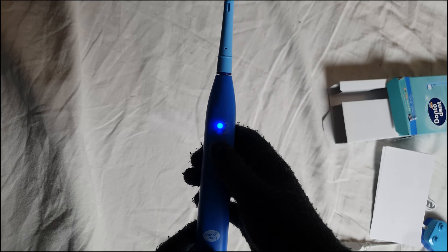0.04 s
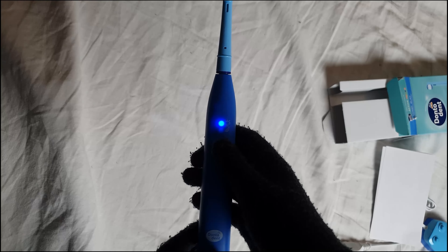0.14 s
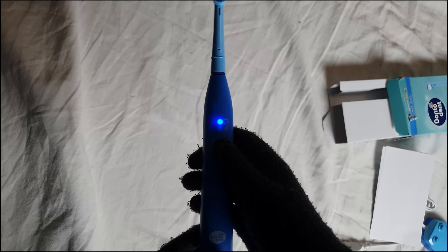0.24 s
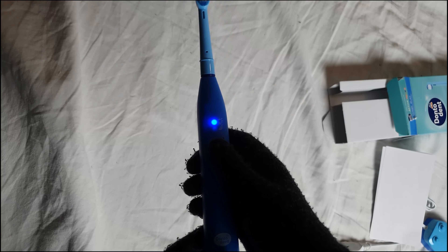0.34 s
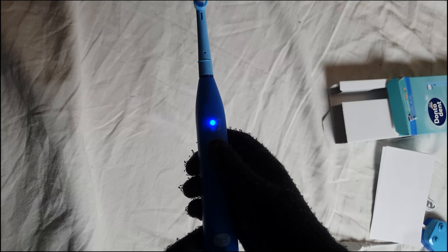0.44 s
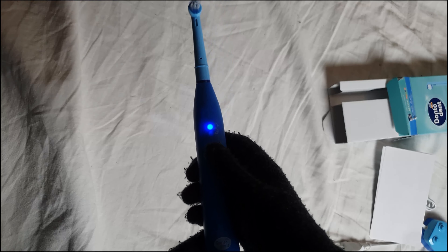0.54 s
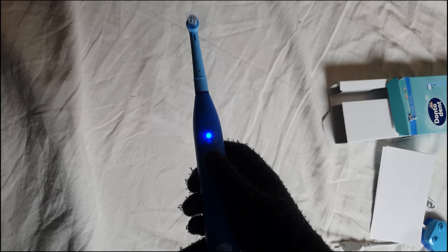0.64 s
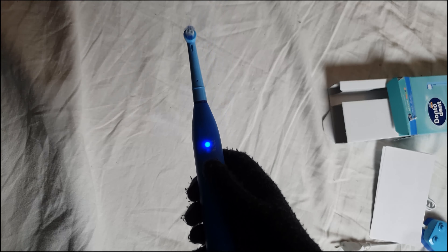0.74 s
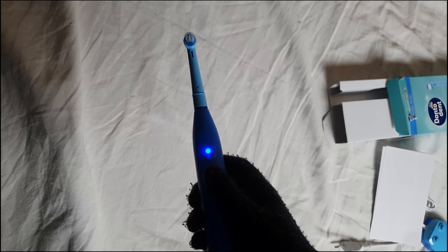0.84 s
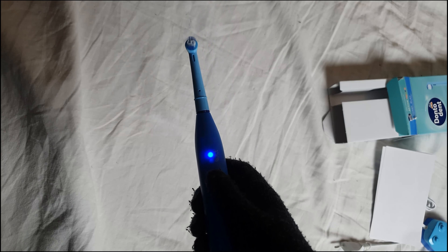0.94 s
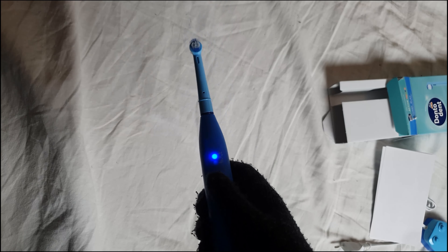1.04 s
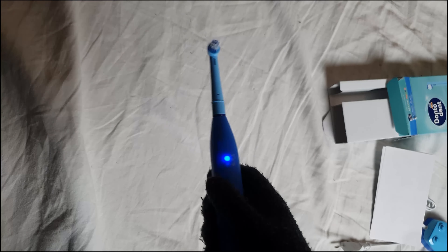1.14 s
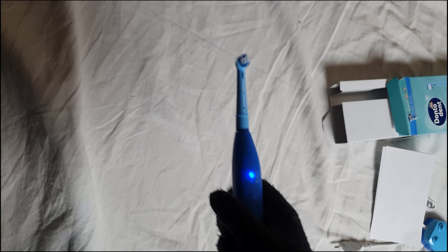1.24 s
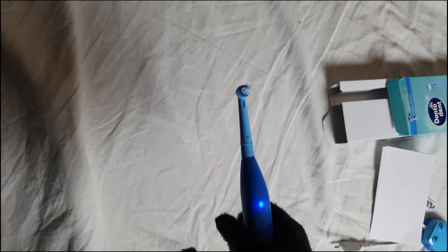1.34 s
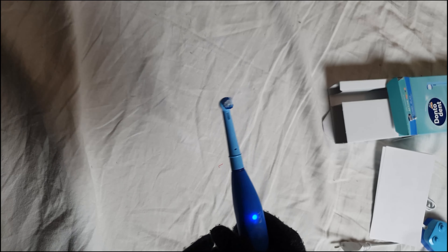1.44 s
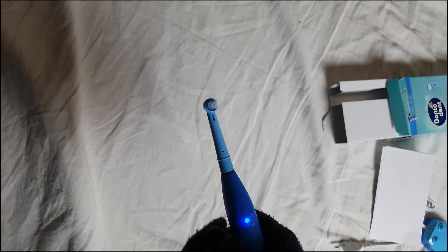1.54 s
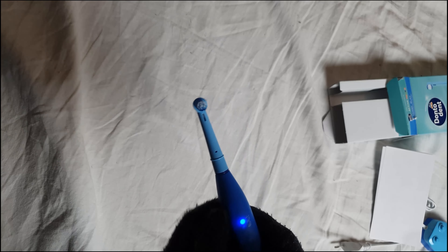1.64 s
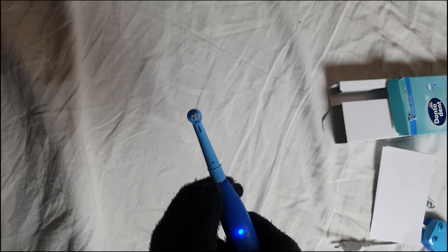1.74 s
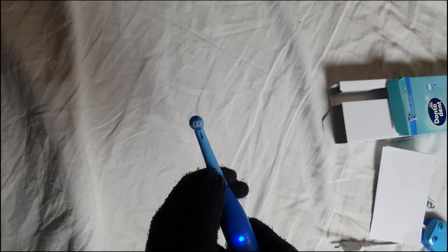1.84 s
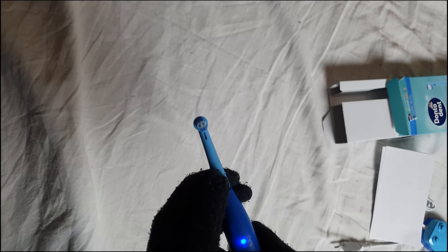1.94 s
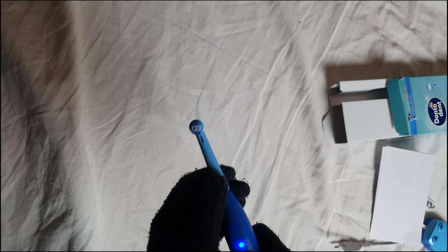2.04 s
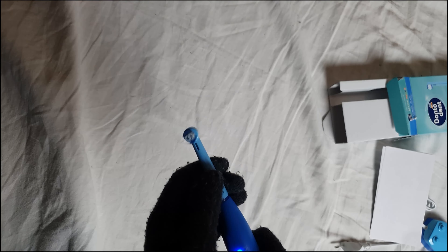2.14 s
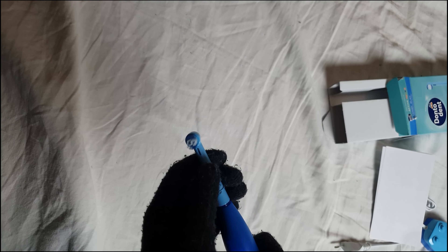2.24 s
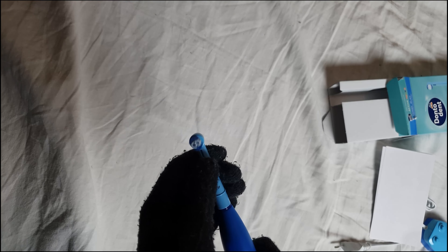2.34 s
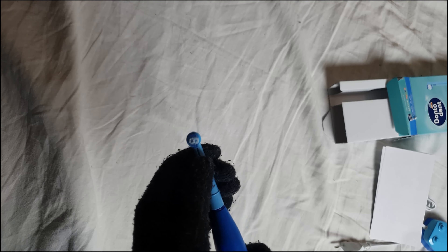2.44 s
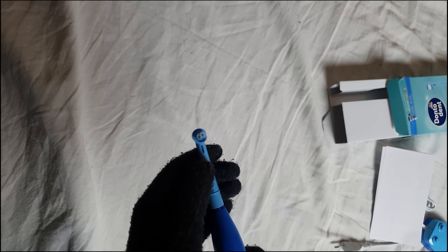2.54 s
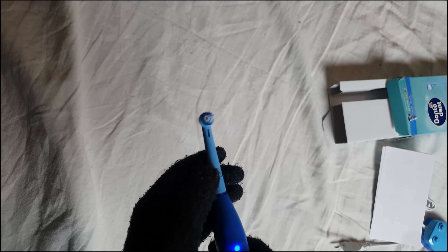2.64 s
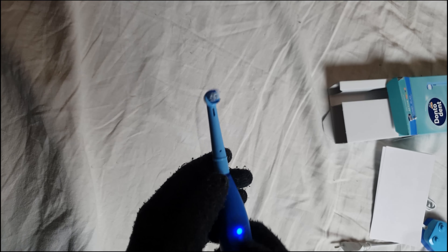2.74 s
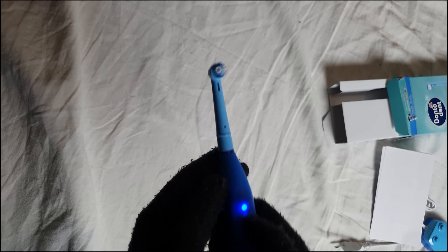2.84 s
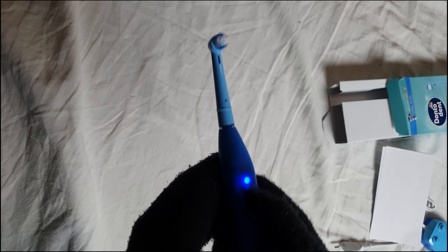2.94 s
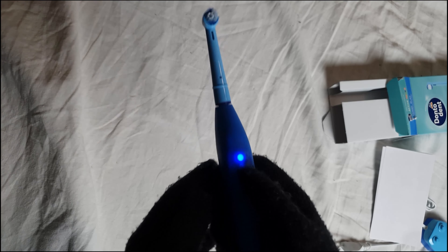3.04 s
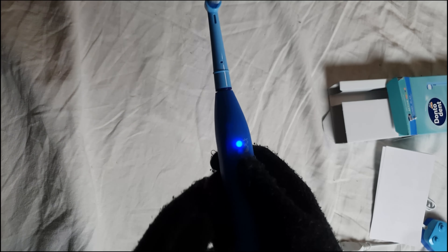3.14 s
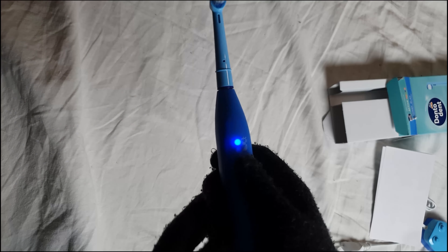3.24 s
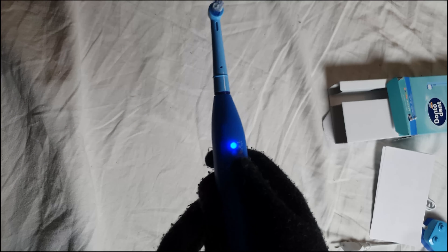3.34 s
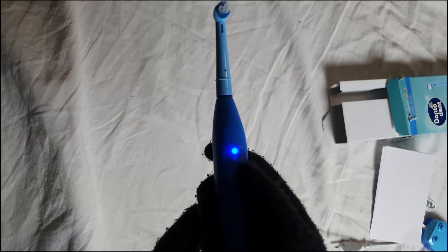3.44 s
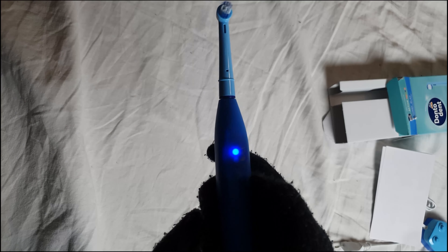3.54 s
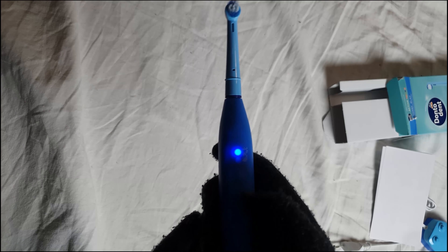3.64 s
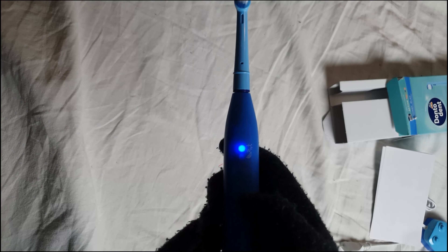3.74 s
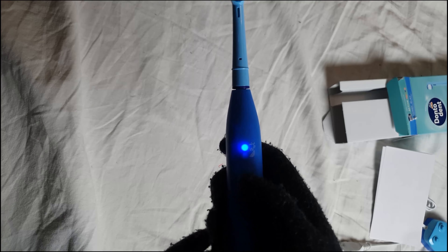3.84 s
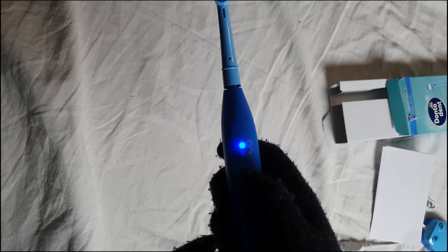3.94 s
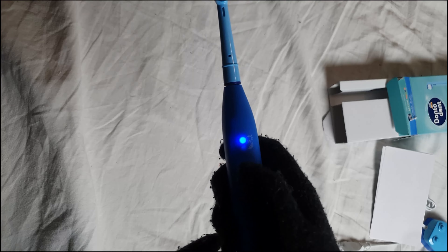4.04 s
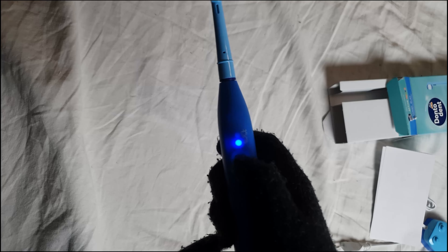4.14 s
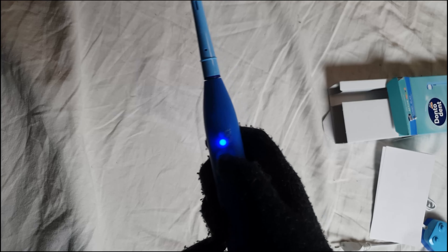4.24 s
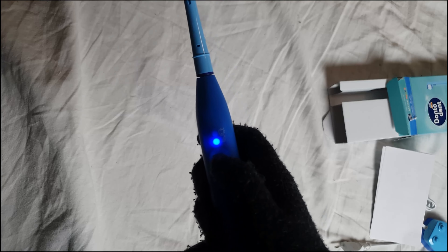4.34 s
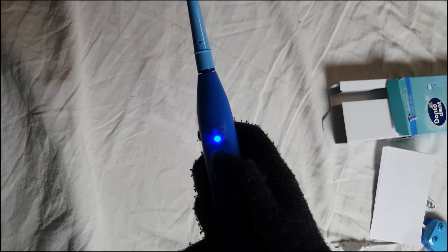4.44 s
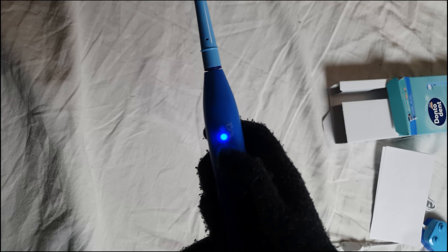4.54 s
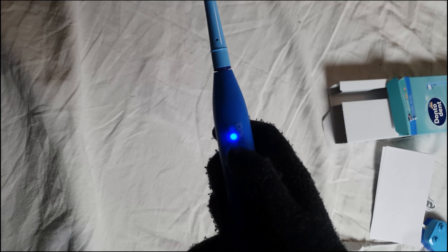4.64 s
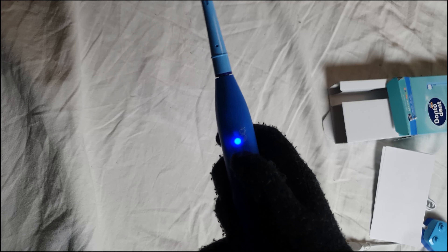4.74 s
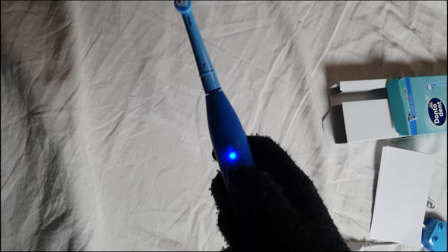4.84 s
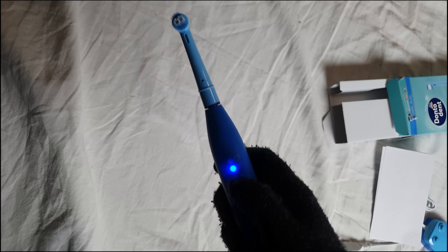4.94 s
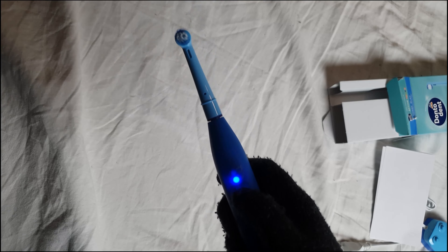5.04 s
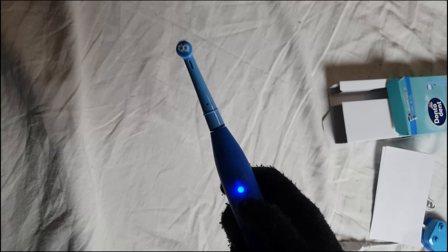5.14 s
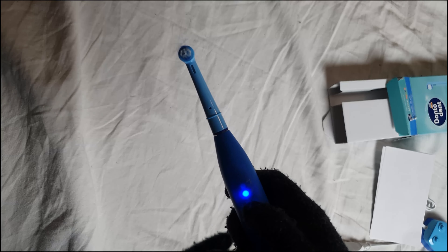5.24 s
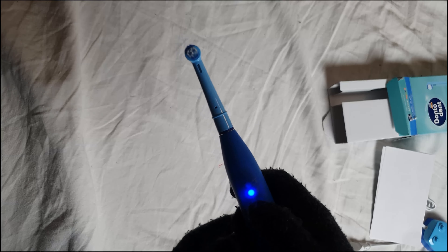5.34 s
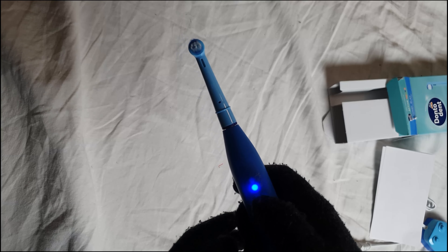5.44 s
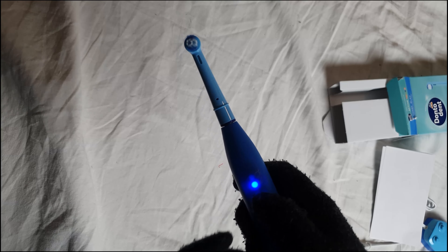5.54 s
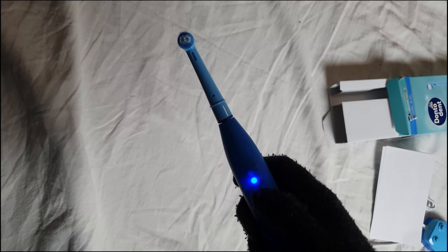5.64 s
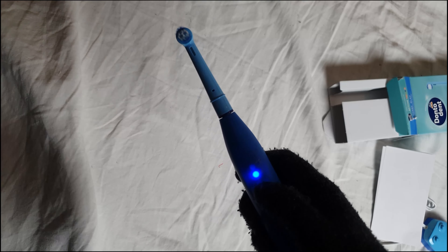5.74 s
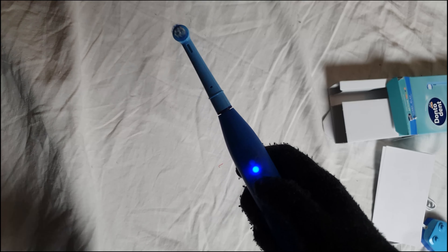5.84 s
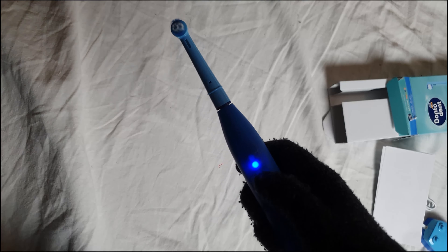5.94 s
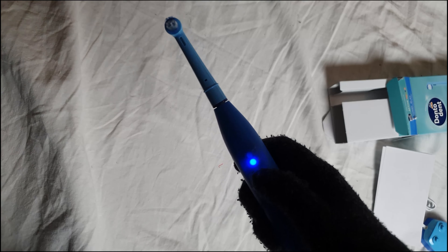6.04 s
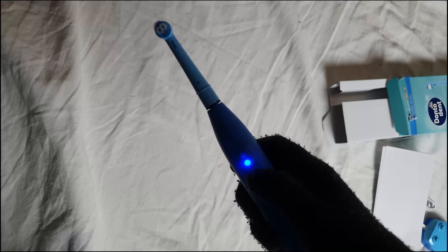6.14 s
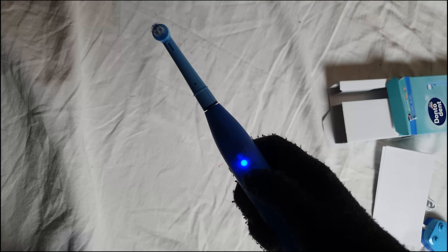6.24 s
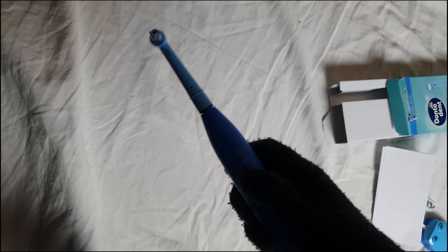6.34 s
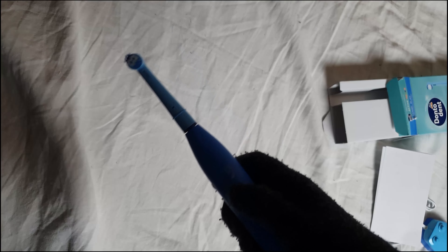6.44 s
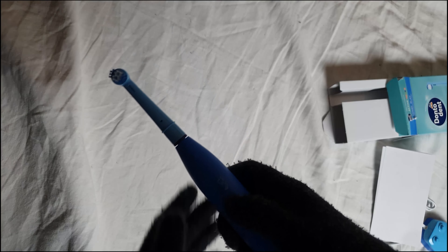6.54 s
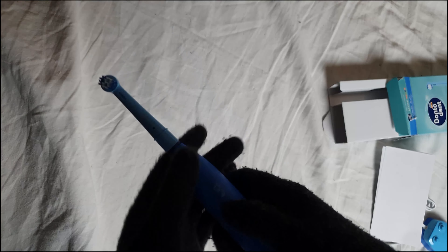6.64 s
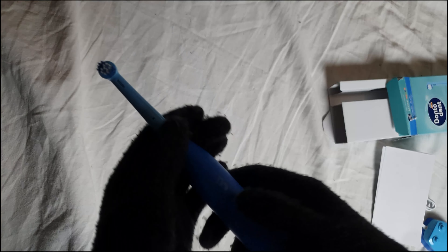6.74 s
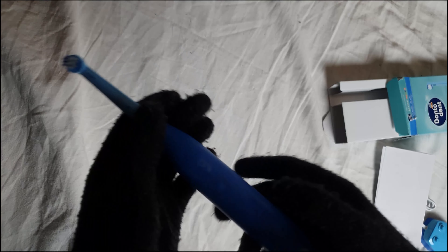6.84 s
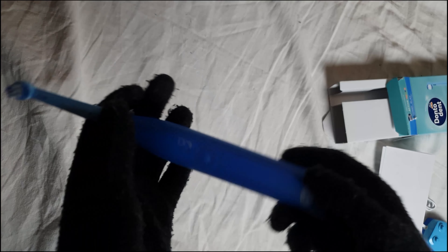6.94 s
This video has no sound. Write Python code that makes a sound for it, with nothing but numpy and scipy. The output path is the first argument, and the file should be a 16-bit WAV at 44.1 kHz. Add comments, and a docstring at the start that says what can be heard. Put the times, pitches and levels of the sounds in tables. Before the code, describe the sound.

An electric toothbrush buzzes close up with a rattling mid-high whine, drops to a slightly lower speed, then shuts off with small plastic knocks.

```python
"""An electric toothbrush runs in a gloved hand, close to the microphone in a small room.
Its 23-tooth gear whines, built from sine tones locked to the crank. The crank also rattles the plastic
housing on every turn: bursts of coloured noise. Narrow and wide bands of the sound swell and dip.
It steps down to a slower mode, is switched off and coasts to rest with a few loose knocks;
then a glove slides along the handle with a soft hiss."""
import sys
import numpy as np
from scipy import signal
from scipy.fft import rfft, irfft
from scipy.io import wavfile

SR = 44100
rng = np.random.default_rng(int(sys.argv[2]) if len(sys.argv) > 2 else 0)


def dump(signal):
    """Clip the signal to [-1, 1] and save it as 16-bit WAV at the path in sys.argv[1]."""
    limited = np.clip(np.atleast_2d(signal).T, -1, 1)
    pcm = np.round(limited * 32767).astype(np.int16)
    wavfile.write(sys.argv[1], SR, pcm)


N = 308700
TIME = np.arange(N) / SR   # seconds


def from_db(db):
    """Turn decibels into a plain multiplier."""
    return 10 ** (np.asarray(db) / 20)


def rms_one(x):
    """Scale a sound to an average power of one."""
    return x / np.sqrt(np.mean(x ** 2) + 1e-20)


def in_time(rows):
    """Draw straight lines between the rows of a time table; give each column at every sample."""
    seconds, *columns = np.transpose(rows)
    return [np.interp(TIME, seconds, column) for column in columns]


def at_hz(points, hz):
    """Read a pitch table, with pitch spaced as the ear hears it (on a log scale)."""
    table_hz, value = np.transpose(points)
    return np.interp(np.log(np.maximum(hz, 1)), np.log(table_hz), value)


def during(one_edge, other_edge):
    """About 1 between two soft edges and 0 outside; reversed edges give a negative result."""
    softness_s = .05
    first_step = np.tanh((TIME - one_edge) / softness_s)
    second_step = np.tanh((TIME - other_edge) / softness_s)
    return (first_step - second_step) / 2


def drift(rate_hz):
    """Wander by chance around zero with spread 1; changes faster than the rate are smoothed away."""
    step = 100   # samples between two chance values
    r = np.exp(-2 * step * np.pi * rate_hz / SR)
    chance = rng.standard_normal(N // step + 2002)
    slow = signal.lfilter([1], [1, -2 * r, r * r], chance)[2000:]   # skip the filter's start
    return np.interp(np.arange(N) / step, np.arange(len(slow)), rms_one(slow))


# how much stronger the left side is than the right: (pitch [Hz], left over right [dB])
TILT = [(60, -2), (300, -3.5), (700, -1), (1400, 2.5), (2600, -2.5), (4400, 2.5), (6200, 2), (8300, 10.5),
        (11000, 7), (15000, 5.5)]
PORT_LAG_S = 0.00016   # sound reaches the left microphone opening this much earlier


def colour(pair, spectrum):
    """Filter a stereo pair to a spectrum, lean it left or right by pitch, and scale to unit power."""
    hz = np.arange(N // 2 + 1) * SR / N
    level, half_tilt = at_hz(spectrum, hz), at_hz(TILT, hz) / 2
    left = from_db(level + half_tilt) * np.exp(2j * np.pi * hz * PORT_LAG_S)
    right = from_db(level - half_tilt)
    return rms_one(irfft(rfft(pair) * np.array([left, right]), N))


def spread(three, alike):
    """Mix one shared signal with one for each side; alike = 1 makes both sides the same."""
    alike = np.clip(alike, 0, 1)
    return np.sqrt(alike) * three[0] + np.sqrt(1 - alike) * three[1:]


def noise(alike):
    """White noise on two sides that are partly alike."""
    return spread(rng.standard_normal((3, N)), alike)


def tone(angle, db, pan_db, lead):
    """A sine on two sides: positive pan is louder on the left, lead [radians] starts the left earlier."""
    lean = from_db(pan_db / 2)
    level = from_db(db) / np.sqrt((lean ** 2 + lean ** -2) / 4)   # keeps the average power when leaning
    return level * np.array([lean * np.sin(angle + lead), np.sin(angle) / lean])


# the crank speed wavers with the load in the fast mode: (time [s], speed [turns per s])
FAST_SPEED = [(0.0, 65.0), (0.15, 64.8), (1.72, 64.6), (1.9, 64.9), (2.15, 64.7), (2.63, 65.2),
              (2.95, 65.0), (3.53, 65.3), (4.03, 64.5), (4.12, 64.9)]
# the same in the slow mode: (time [s], speed [turns per s])
SLOW_SPEED = [(4.4, 58.4), (4.63, 58.5), (5.194, 57.6), (5.7, 57.6), (6.074, 57.3), (6.29, 58.0)]
STEP_DOWN_S, SETTLE_S = 4.148, .06   # start of the slow mode, time constant of settling into it
OFF_S, COAST_S = 6.311, .172         # switched off, time that friction takes to stop it evenly


def motor():
    """Speed under power, share of the slow mode, and share of the speed left after switching off."""
    slow = 1 - np.exp(-np.maximum(TIME - STEP_DOWN_S, 0) / SETTLE_S)
    powered = (1 - slow) * in_time(FAST_SPEED)[0] + slow * in_time(SLOW_SPEED)[0]
    left = np.clip(1 - (TIME - OFF_S) / COAST_S, 0, 1)
    return powered, slow, left


# strongest gear tones, with base levels that the swings below move: (multiple of the crank speed,
# fast mode [dB], slow mode [dB], share of the tooth swing, share of the load swing,
# share of the octave swing, share of the third-harmonic swing, left over right [dB],
# left lead [radians], place in the turn [turns], throb depth [0-1], beat depth [0-1])
GEAR = [(21, -48, -51.5, 0, .6, 0, 0, -3, 1.4, .72, 0, .25),
        (22, -55.5, -53.5, 0, 1.2, 0, 0, 1, .8, .72, 0, .08),
        (23, -41.7, -41.7, 1, 0, 0, 0, 0, 0, .72, 0, .04),
        (44, -47.5, -50.5, 0, .3, .2, 0, -2, 2.3, .59, .3, .17),
        (46, -44.5, -45.5, 0, 0, 1, 0, 0, 2.0, .59, .5, .1),
        (48, -45, -49, 0, 0, .6, 0, 0, 2.2, .59, .35, .17),
        (69, -54, -54, 0, 0, 0, 1, 5, 4.3, .63, .95, .2)]
# weaker tones from uneven teeth, base levels: (multiple of the crank speed, fast mode [dB], slow mode [dB])
SIDEBANDS = [(6, -82, -82), (7, -77, -81), (8, -77, -76), (10, -73, -79), (12, -77, -69), (13, -70, -70),
             (14, -62, -60), (15, -70, -62), (16, -67, -59), (17, -69, -65), (18, -62, -64), (19, -56, -60),
             (20, -62, -61), (24, -54, -54), (25, -55, -57), (26, -58, -59), (27, -62, -60), (35, -52, -57),
             (40, -51, -58), (42, -54, -58), (43, -54, -57), (45, -56, -54), (47, -57, -58), (49, -50, -57),
             (50, -54, -50), (52, -56, -48), (54, -54, -50), (56, -53, -50), (59, -54, -52), (68, -59, -51),
             (70, -61, -53), (71, -64, -56), (72, -64, -55)]
# how well the housing sends out a gear tone, used as it slides down in pitch: (pitch [Hz], level [dB])
HOUSING = [(100, -44), (550, -6), (780, 6), (1050, 12), (1550, 13.5), (2000, 1), (2700, 0.5), (4200, 3)]
# The next four act only through their swing around their own average.
# whine at the tooth rate: (time [s], level [dB])
TOOTH_SWING = [(0.05, -43), (.4, -42), (.85, -46), (1.25, -48), (1.45, -45), (1.8, -46.5), (2.15, -44),
               (2.75, -45), (3.02, -40.5), (3.3, -43.5), (3.48, -36.5), (3.98, -37.5), (4.05, -41.5),
               (4.12, -38.5), (4.2, -41), (4.4, -37.5), (5.3, -41), (6.25, -40)]
# uneven load on the gear, in the tones beside the whine: (time [s], level [dB])
LOAD_SWING = [(0, -1.5), (1.2, 2), (2.5, -2), (2.75, 8), (3.02, 11), (3.25, 1.5), (3.55, 10.5), (4.0, 3.5),
              (4.6, 5.5), (5, -6.5), (6.3, -0.5)]
# octave of the whine: (time [s], level [dB])
OCTAVE_SWING = [(0, -51), (.45, -44.5), (1.25, -40.5), (1.6, -49), (1.85, -46), (2.15, -49), (2.4, -44),
                (3.0, -48), (3.2, -42), (3.55, -44), (3.95, -41.5), (4.17, -45), (4.35, -40), (4.65, -39),
                (5.0, -42), (5.6, -46.5), (6.3, -45)]
# third harmonic of the whine: (time [s], level [dB])
THIRD_SWING = [(0, -64), (1.1, -57), (1.5, -56), (1.85, -48), (2.2, -52), (2.85, -53), (3.2, -63),
               (3.6, -63), (3.95, -53), (4.6, -51), (5.5, -49), (6.3, -48.5)]
# the handle turns between the microphone openings: (time [s], tooth whine left over right [dB],
# left lead of the tooth whine [radians], whine near the octave left over right [dB])
LEAN = [(0, 7, 1.53, 1), (1.2, 6, 1.86, 14.5), (1.48, -3, 1.8, -8), (1.8, 2, 2.2, 0), (2.2, 1, 1.95, 14),
        (2.42, 9, 2.6, 5), (2.8, -1, 1.5, 7), (3.1, -1, 2.2, -4), (3.6, 0.5, 1.53, 0), (4.0, -4.5, 2.1, 5),
        (4.3, 4.5, 1.14, -2.5), (5.0, 3, 1.3, -1), (6.3, 5.5, 1.55, -6)]
TEETH = 23
BEAT_HZ = 5.3   # rate of the slow beats


def gear(turn, powered, left, slow, play_db, low_side_db=0.5, high_side_db=-3.5, play_share=0.61, octave_share=0.45):
    """Meshing teeth give tones at multiples of the crank speed; coasting, non-tooth ones fade faster."""
    swing_tables = (TOOTH_SWING, LOAD_SWING, OCTAVE_SWING, THIRD_SWING)
    swings = np.array([in_time(table)[0] for table in swing_tables])
    swings = swings - swings.mean(axis=1, keepdims=True)
    tooth_pan, tooth_lead, high_pan = in_time(LEAN)
    out, coasting, loaded = np.zeros((2, N)), left < 1, left ** 2
    # quick unsteadiness [dB]: 0.6 in the fast mode, 0.45 in the slow mode, 2.5 coasting
    flutter_db = np.where(coasting, 2.5, np.interp(slow, [0, 1], (.6, .45)))

    def level_db(k, fast_db, slow_db):
        """A tone's level by mode; coasting, it slides down through the housing's resonances."""
        db = fast_db + slow * (slow_db - fast_db)
        hz = k * powered[coasting]
        db[coasting] += at_hz(HOUSING, hz * left[coasting]) - at_hz(HOUSING, hz)
        return db

    for k, fast_db, slow_db, *shares, pan, lead, place, throb, beat in GEAR:
        angle = 2 * np.pi * (turn - place)
        is_tooth, near_octave = k == TEETH, abs(k - 2 * TEETH) <= 2
        db = level_db(k, fast_db, slow_db) + np.dot(shares, swings) + flutter_db * drift(20)
        # the teeth press harder once a turn, and the tone swells in slow beats
        throbbing = 1 + throb * np.cos(angle)
        beating = 1 + beat * np.cos(2 * np.pi * (BEAT_HZ * TIME + rng.random()))
        pan_now = pan + is_tooth * tooth_pan + near_octave * high_pan
        lead_now = lead + is_tooth * tooth_lead + .1 * drift(.3)
        line = throbbing * beating * tone(k * angle, db, pan_now, lead_now)
        out += line * (loaded if k % TEETH else 1)

    for k, fast_db, slow_db in SIDEBANDS:
        hz, high, near_octave = k * powered[0], k > 30, 43 <= k <= 49
        chance_angle = (.8 if high else np.pi) * rng.normal()
        angle = 2 * np.pi * k * (turn - .61) + chance_angle
        db = level_db(k, fast_db, slow_db) + 2 * drift(1.0)
        db = db + (high_side_db + play_share * play_db if high else low_side_db)
        db = db + near_octave * octave_share * swings[2]
        lead = 2 * np.pi * hz * PORT_LAG_S + rng.normal(0, 0.38)
        out += loaded * tone(angle, db, at_hz(TILT, hz), lead)
    return out


# a firm grip lets the handle hum: (from [s], to [s], level of the lower hum tone [dB])
GRIPS = [(0, 1.7, -78), (2.85, 4.07, -72.5)]


def hum(turn, pan_db=-4, fourth_db=-4):
    """The third and fourth multiples of the crank speed shake the whole handle as low tones."""
    level = sum(from_db(db) * during(start, end) for start, end, db in GRIPS)
    third = tone(3 * 2 * np.pi * turn, 0, pan_db, 0)
    fourth = tone(4 * 2 * np.pi * turn, fourth_db, pan_db, 0)
    return level * (third + fourth)


def surface(turn, alike, wear, size=680):
    """The same roughness passes on every turn, slowly changing as the parts shift."""
    tracks = signal.resample(rng.standard_normal((2, 3, size)), size * 10, axis=-1)
    position = (turn % 1 * (size * 10 - 1)).astype(int)
    passing = tracks[:, :, position]
    shift = wear * drift(0.42)   # fades between two rough tracks
    return spread(np.cos(shift) * passing[0] + np.sin(shift) * passing[1], alike)


# contacts within one turn, levels relative: (place [turns], width [turns], fast-mode rattle [dB],
# slow-mode rattle [dB], buzz and sizzle [dB], clatter [dB])
CONTACTS = [(0.107, 0.019, -12.5, -5.5, -18, -18.5), (0.298, 0.068, 2, -16, -7.5, -11),
            (0.52, 0.012, -18.5, -3.5, -5, -13), (0.576, 0.044, 1, 4.5, -17.5, 1.5),
            (0.649, 0.0052, -5, 11.5, 1, 2.5), (0.737, 0.011, -15, -19.5, 1, -6),
            (0.805, 0.065, -2.5, 1.5, -11, -14)]


def pressure(turn, levels_db, idle_db, uneven_db, narrow):
    """Contact force peaks at each contact in the turn, and lands a little differently every time."""
    lap, force = turn.astype(int), from_db(idle_db)
    for (place, width, *_), level_db in zip(CONTACTS, levels_db):
        chance = np.clip(rng.standard_normal(512), -2, 2)   # one value for each turn
        strength = from_db(level_db + uneven_db * chance)
        away = (turn - place + .5) % 1 - .5   # distance from the contact, in turns
        force = force + strength[lap] * np.exp(-np.abs(away) * narrow / width)
    return force


# Colours of the drive noises, relative levels. Low rub: (pitch [Hz], level [dB])
RUB = [(100, -24), (150, -18), (230, -21.5), (350, -12.5), (600, -12.5), (850, -3.5), (1100, -0.5),
       (1400, 3.5), (1750, 2.5), (2200, -31), (4000, -52)]
# plastic rattle: (pitch [Hz], level [dB])
RATTLE = [(600, -41), (1400, -6.5), (1900, -1.5), (2300, 3), (3050, 3), (3500, -3.5), (4000, -12),
          (9000, -22)]
# clatter of the shaft: (pitch [Hz], level [dB])
CLATTER = [(2000, -30.5), (3300, -5), (3700, -2.5), (4050, -1), (4700, -12.5), (5400, -18.5), (9000, -58.5)]
# buzz: (pitch [Hz], level [dB])
BUZZ = [(2500, -34), (4500, -3), (5200, 0.5), (6100, 2.5), (6800, -2.5), (7600, -37), (14000, -56)]
# sizzle: (pitch [Hz], level [dB])
SIZZLE = [(3000, -49), (6300, -21), (7300, 2.5), (8200, 3.5), (9200, 1.5), (10500, -6.5), (12700, -11.5),
          (15000, -24.5), (16000, -43.5)]
# finest, sharpest ticks: (pitch [Hz], level [dB])
CRACKLE = [(6000, -27), (9000, -5), (10500, -5), (12700, -5), (15000, -9.5), (16000, -32.5)]
KNOCK_UNEVEN_DB, TICK_UNEVEN_DB = 1.4, 3.5   # change of a knock and of a hard tick from turn to turn


def drive(turn, slow, play_db):
    """Crank, shaft and brush head knock and scrape: noise that swells at each contact in the turn."""
    _, _, fast_db, slow_db, hard_db, shaft_db = np.transpose(CONTACTS)
    fast_knock = pressure(turn, fast_db, idle_db=-8.5, uneven_db=KNOCK_UNEVEN_DB, narrow=0.72)
    slow_knock = pressure(turn, slow_db, idle_db=-13.0, uneven_db=KNOCK_UNEVEN_DB, narrow=0.62)
    knock = (1 - slow) * fast_knock + slow * slow_knock
    shaft = pressure(turn, shaft_db, idle_db=-10.0, uneven_db=KNOCK_UNEVEN_DB, narrow=0.48)
    tick = pressure(turn, hard_db, idle_db=-9.0, uneven_db=TICK_UNEVEN_DB, narrow=0.78)
    spike = pressure(turn, hard_db, idle_db=-13, uneven_db=TICK_UNEVEN_DB, narrow=2.6)

    def level(db, share):
        """Each noise follows its share of the play."""
        return from_db(db + share * play_db)

    # roughness that repeats each turn, plus noise that is always new
    rattle_grit = surface(turn, 0.15, wear=0.97) + from_db(-4.5) * noise(0.12)
    clatter_grit = surface(turn, 0.98, wear=0.58) + from_db(-1) * noise(0.56)
    buzz_grit = surface(turn, 0.31, wear=0.76) + from_db(0.5) * noise(0.38)
    sizzle_grit = surface(turn, .4, wear=.9) + from_db(2) * noise(.45)

    rub = colour(knock * noise(0.6), RUB) * level(db=-55.0, share=0.08)
    rattle = colour(knock * rattle_grit, RATTLE) * level(db=-41, share=0.5)
    clatter = colour(shaft * clatter_grit, CLATTER) * level(db=-43.5, share=1.14)
    buzz = colour(tick * buzz_grit, BUZZ) * level(db=-46.5, share=0.13)
    sizzle = colour(tick * sizzle_grit, SIZZLE) * level(db=-50.5, share=0.34)
    crackle = colour(spike * noise(0.31), CRACKLE) * level(db=-54.0, share=0.6)
    return rub + rattle + clatter + buzz + sizzle + crackle + brush_head(knock)


# the ring of the brush head: (time [s], centre pitch [Hz], level [dB])
HEAD = [(0, 8950, -59), (2.0, 9000, -69), (2.75, 8620, -59.5), (3.4, 8500, -52.5), (3.85, 8150, -49),
        (4.2, 8140, -55), (4.5, 8100, -49), (5.0, 7900, -54), (6.3, 7900, -51.5)]


def brush_head(knock, width_hz=620, pan_db=10):
    """The knocks excite one broad, high resonance, which sinks as the head settles on its shaft."""
    centre_hz, db = in_time(HEAD)
    knocked_noise = np.sqrt(knock) * (noise(.7) + 1j * noise(.7))
    # smooth the noise into a narrow band, then lift it to the moving centre pitch
    shake = signal.lfilter(*signal.butter(2, width_hz / 2, fs=SR), knocked_noise)
    ring = np.real(shake * np.exp(2j * np.pi * np.cumsum(centre_hz) / SR))
    return from_db(db) * rms_one(ring * from_db(np.array([[pan_db], [0]])))


# looseness in the drive, which raises its noises and the high weak gear tones: (time [s], level [dB])
PLAY = [(0, -2), (1.18, -4), (1.27, -1), (1.42, -5.5), (1.9, -3.5), (3.2, 1), (3.95, 0), (4.11, 1),
        (4.25, 0), (4.6, 0.5), (5.2, -0.5), (6.3, -0.5)]
WHINE_FALL, RATTLE_FALL = 2.0, 1.52   # while coasting, strength goes with these powers of the speed


def toothbrush(wobble_turns=0.0014):
    """One crank angle drives the whine and the rattle; both die as it coasts to rest."""
    powered, slow, left = motor()
    turn = np.abs(np.cumsum(powered * left) / SR + wobble_turns * drift(11.0))
    play_db, = in_time(PLAY)
    whine = gear(turn, powered, left, slow, play_db) + hum(turn)
    rattle = drive(turn, slow, play_db)
    return left ** WHINE_FALL * whine, left ** RATTLE_FALL * rattle + run_out()


ROOM_T60_S = 0.21   # time for the echo to fall by 60 dB


def room(x, wall_hz=4500):
    """A short, dull tail of fading noise, different on each side, echoes the sound."""
    t = TIME[:SR // 2]
    tail = rng.standard_normal((2, len(t))) * from_db(-60 * t / ROOM_T60_S)
    tail = tail * (t > .006)   # a short gap before the echo
    tail = tail / np.sqrt(np.sum(tail[0] ** 2))
    tail = signal.lfilter(*signal.butter(1, min(wall_hz, SR / 3), fs=SR), tail)
    return signal.fftconvolve(x, tail, axes=1)[:, :N]


# shifts of the sound's colour: (one edge [s], other edge [s], centre pitch [Hz], width [Hz],
# gain [dB]); reversed edges turn a boost into a cut and a cut into a boost
COLOUR_SHIFTS = [(-0.1, 1.68, 460, 110, 4.5), (0, 1.33, 905, 30, 4), (-0.06, 1.3, 5500, 970, -6.5),
                 (.3, 1.2, 7030, 280, 7), (0.8, 2.4, 1690, 71, 4.5), (1.3, 2.2, 1357, 35, 2),
                 (1.6, 2.46, 1635, 45, -3), (1.9, 1.65, 3340, 150, 3), (1, 2.58, 2850, 90, -7),
                 (2, 2.3, 3150, 110, -1), (1, 2.2, 4480, 340, 2.5), (1.45, 2.2, 1900, 120, 1),
                 (2.5, 2.57, 3300, 156, 10), (2.3, 2.55, 13200, 1600, 5.5), (2.5, 3.35, 1596, 82, -4.5),
                 (3.5, 2.9, 3600, 110, 2), (5.5, 5.8, 2690, 140, -2), (3, 3.4, 3900, 70, 4),
                 (3, 3.1, 4700, 700, 3), (3, 3.4, 3280, 110, 4.5), (3, 4.1, 3110, 80, 3),
                 (3.0, 3.75, 12300, 2200, 3), (4, 4.2, 4180, 610, 4), (4.0, 4.3, 1750, 220, 5.5),
                 (4, 4.28, 12500, 2000, 6), (4.5, 4.85, 12700, 1800, 4), (3, 5.5, 2810, 45, -4),
                 (4.3, 5.83, 3130, 130, 3.5), (4.3, 6.3, 3450, 150, 1.5), (6, 6.28, 3070, 200, 6.5),
                 (5.5, 6.25, 3900, 190, 3.5), (3, 4.3, 2080, 160, 3), (6, 6.5, 13000, 1500, 4.5)]


def shift_colour(x):
    """Bands of the sound are raised or lowered for a while, so its colour shifts."""
    spectrum, hz = rfft(x), np.arange(N // 2 + 1) * SR / N
    for one_edge, other_edge, centre_hz, width_hz, gain_db in COLOUR_SHIFTS:
        band = irfft(spectrum * np.exp(-((hz - centre_hz) / width_hz) ** 2), N)
        x = x + (from_db(gain_db) - 1) * during(one_edge, other_edge) * band
    return x


# soft bumps of the hand, added to a steady floor: (time [s], half length [s], peak level [dB])
BUMPS = [(.36, 0.26, -71), (0.81, 0.089, -73), (1.462, 0.075, -66.5), (1.844, 0.15, -68),
         (2.183, 0.035, -59.5), (2.52, 0.028, -72), (2.893, 0.12, -68), (4.17, .1, -71.5),
         (5.497, 0.018, -68.5), (6.68, 0.015, -75)]
# colour of the hand's rumble, relative levels: (pitch [Hz], level [dB])
RUMBLE = [(15, -36.5), (30, -26.5), (47, 4.5), (62, -2.5), (90, -2), (130, -12), (220, -24), (500, -27),
          (2000, -59)]
RUMBLE_FLOOR_DB = -77


def hand():
    """The grip makes a low rumble that swells in soft bumps."""
    level = from_db(RUMBLE_FLOOR_DB)
    for middle_s, half_s, db in BUMPS:
        level = level + from_db(db) * np.exp(-((TIME - middle_s) / half_s) ** 2)
    return level * colour(noise(0.78), RUMBLE)


# colour of the still air, relative levels: (pitch [Hz], level [dB])
AIR = [(100, -1), (400, -3), (1500, -9), (5000, -16), (16000, -22)]


def still_air():
    """Still air is a faint, steady noise, stronger in the low pitches."""
    return from_db(-81.0) * colour(noise(0.83), AIR)


# loose knocks as the drive runs out, relative levels: (time [s], level [dB])
KNOCKS = [(6.356, -28), (6.379, -22.5), (6.4063, -25.5), (6.413, -26), (6.453, -33.5), (6.469, -44)]


def run_out(knock_db=-12.5, ring_s=0.0047):
    """Short plastic knocks, fading noise bursts, as the slack gears catch up with each other."""
    level = np.zeros(N)
    for start_s, db in KNOCKS:
        fade = np.exp(-np.abs(TIME - start_s) / ring_s) * (TIME >= start_s)
        level = level + from_db(db + knock_db) * fade
    # (pitch [Hz], level [dB])
    plastic = [(500, -20.5), (1000, 10), (3300, 0), (5000, -8), (9000, -5), (16000, -23)]
    return np.std(level) * colour(level * noise(0.4), plastic)


# colour of the glove's hiss, relative levels: (pitch [Hz], level [dB])
GLOVE = [(500, -27), (1800, -7), (2900, 3.5), (4000, 2), (5500, -1.5), (8800, 1), (12000, -4.5),
         (16000, -16.5)]
GLOVE_S, GLOVE_ATTACK_S, GLOVE_LEVEL_DB = 6.56, 0.19, -70.5   # start, rise time, full level


def glove():
    """The glove rubs along the handle: a hiss that grows and then stays."""
    slide = np.clip((TIME - GLOVE_S) / GLOVE_ATTACK_S, 0, 1) ** 2
    return from_db(GLOVE_LEVEL_DB) * slide * colour(noise(0.16), GLOVE)


def scene():
    """The brush and its echo shift in colour; the hand, the glove and still air are added."""
    whine, rattle = toothbrush()
    echo = room(from_db(-26) * whine + from_db(-3.5) * rattle)   # the rattle echoes far more
    return shift_colour(whine + rattle + echo) + hand() + glove() + still_air()


CUTOFF_HZ = 15650


def record(dry):
    """The top is cut steeply."""
    steep = signal.ellip(10, .05, 60, CUTOFF_HZ, fs=SR, output="sos")
    return signal.sosfiltfilt(steep, dry)


dry = scene()
out = record(dry)
dump(out)
```